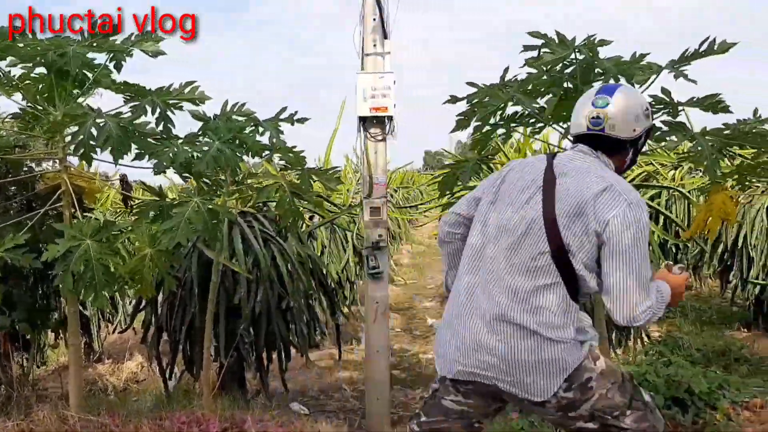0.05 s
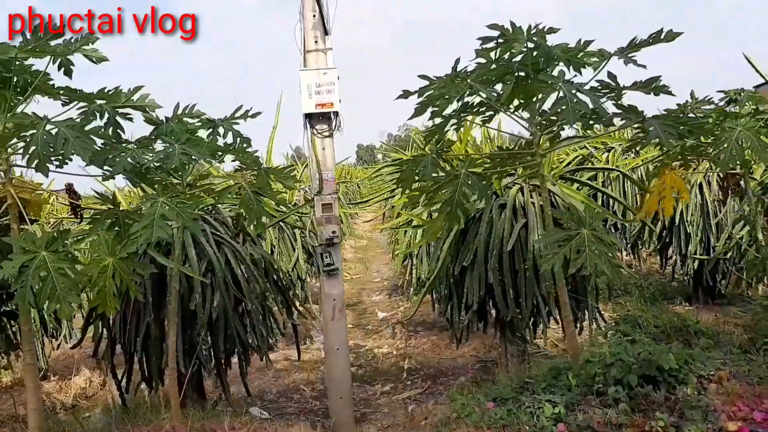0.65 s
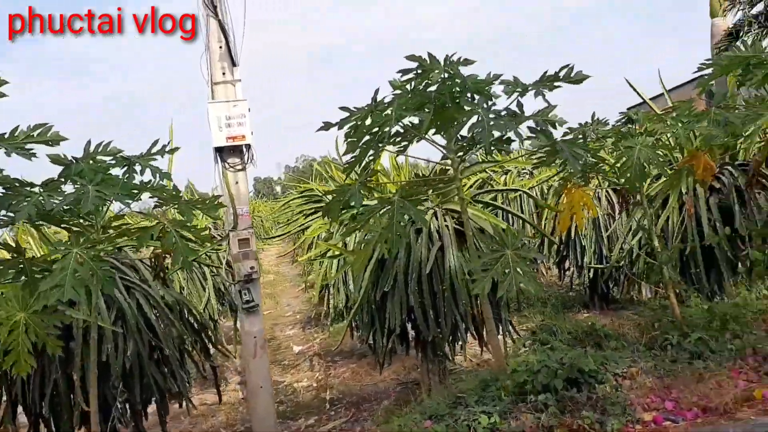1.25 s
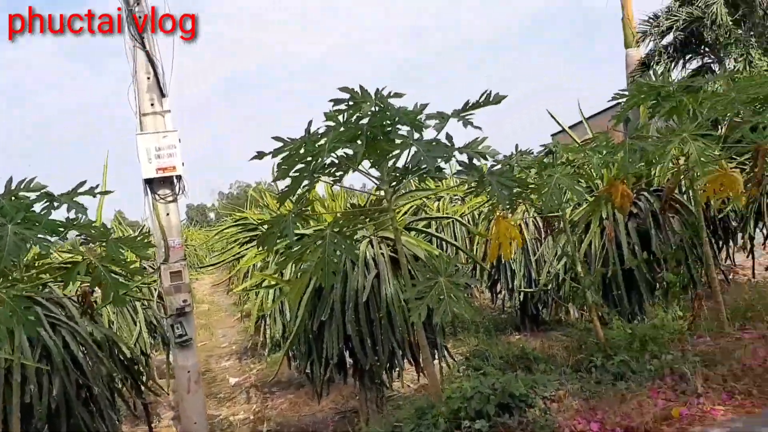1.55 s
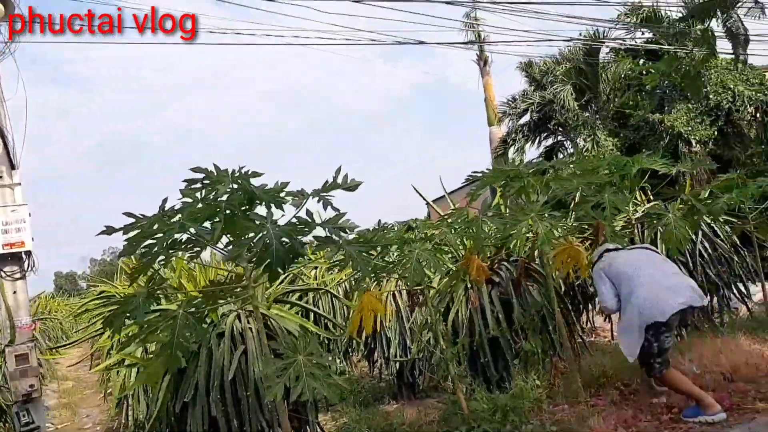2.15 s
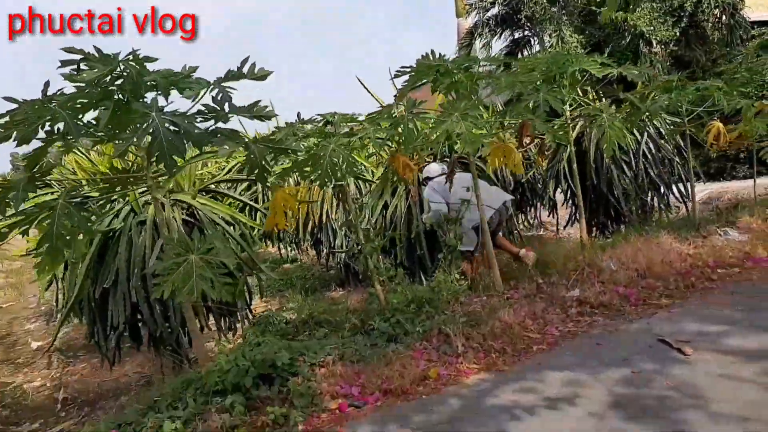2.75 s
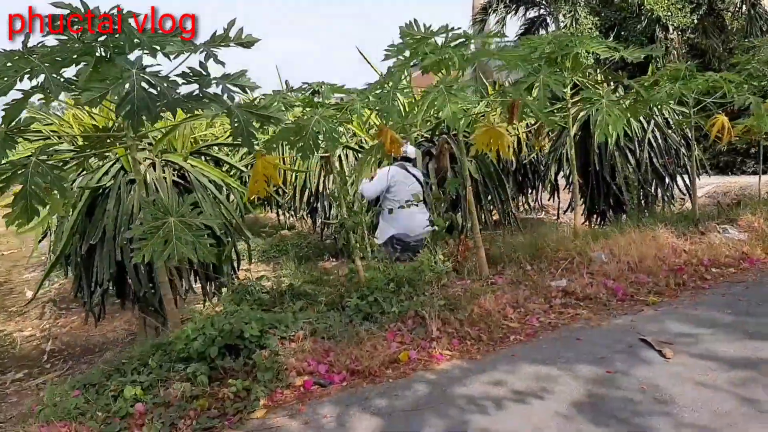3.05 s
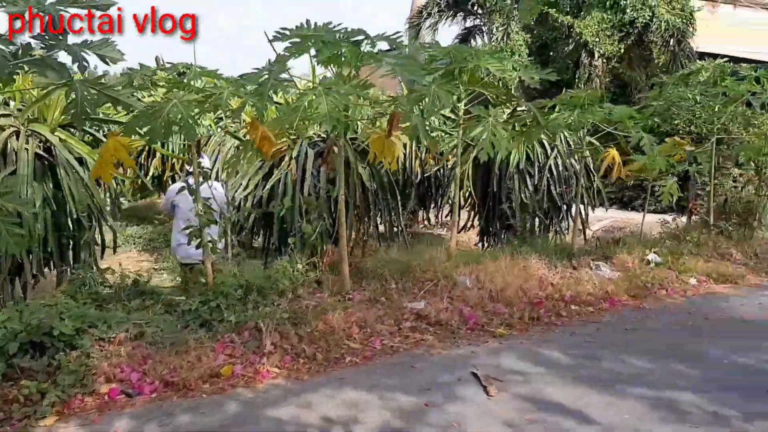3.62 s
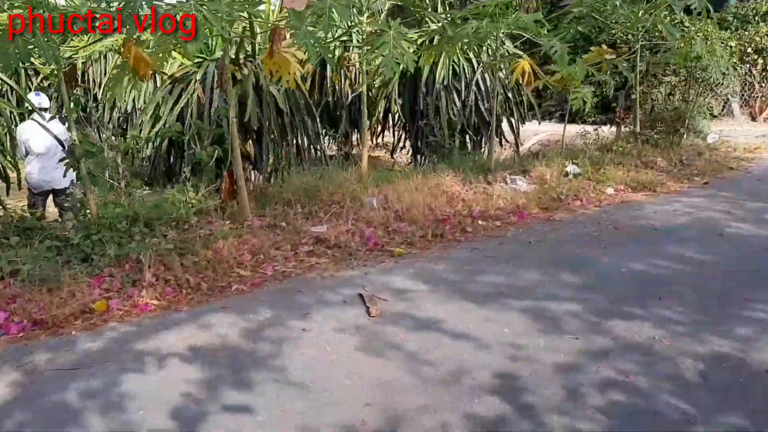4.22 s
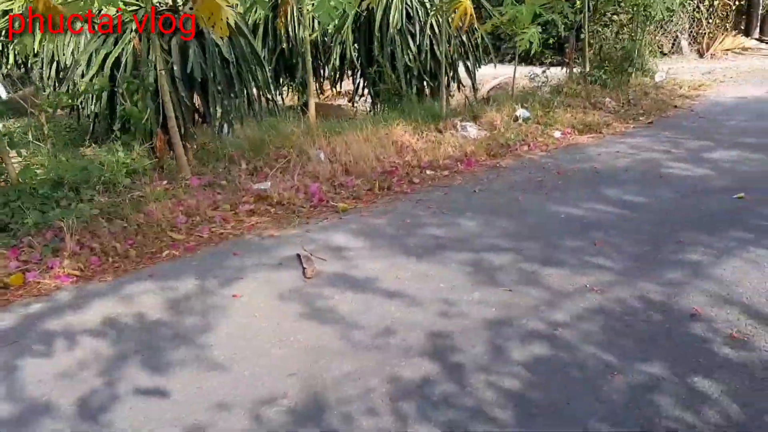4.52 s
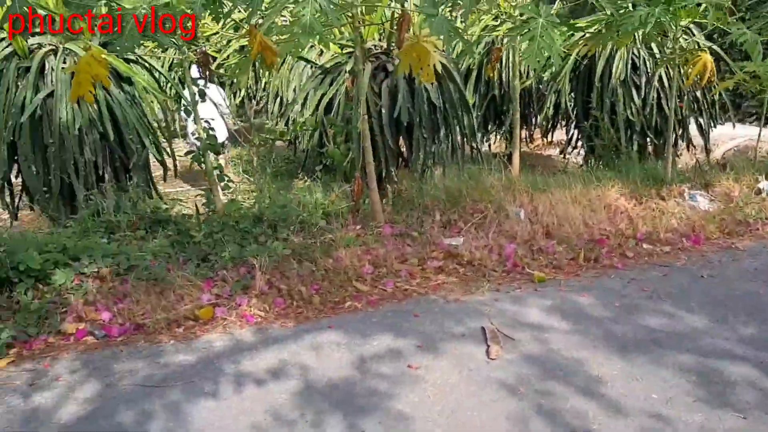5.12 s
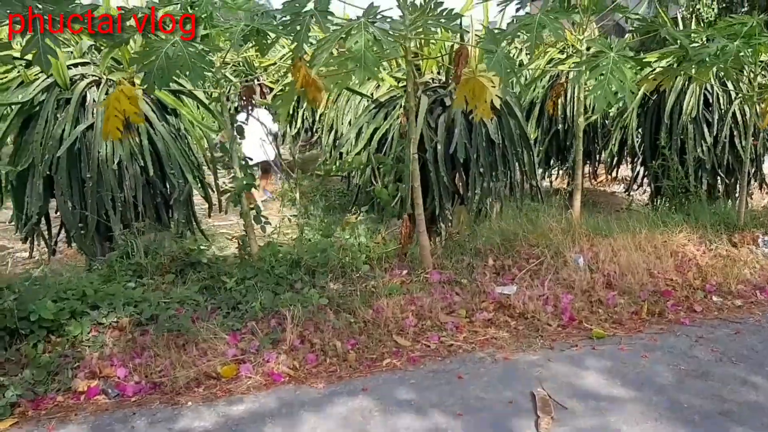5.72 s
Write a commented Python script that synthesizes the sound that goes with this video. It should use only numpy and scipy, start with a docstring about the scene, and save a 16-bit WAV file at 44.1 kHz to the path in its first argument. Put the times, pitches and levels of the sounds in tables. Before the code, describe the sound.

In a quiet orchard a bird repeats a short hooting call that rises, breaks upward and slides down. Someone walks through dry weeds, with swishing leaves, soft thuds and ticking twigs. Early on the bird pauses, a stick cracks sharply, and a soft throaty rattle follows before the hoots resume at an even pace. A light breeze rumbles on the microphone over a faint country hush.

```python
"""An orchard, where a bird repeats a hooting call that rises, breaks upward and slides down, with soft rattles
ringing its throat between calls. A short echo doubles the voice and foliage scatters it. Someone walks through
dry weeds: leaves swish, soles scuff and thud, twigs tick and one stick cracks sharply. A light breeze rumbles
at the microphone; behind it all lie a country hush, a faint squeak and the twitter of small birds."""
import sys
import numpy as np
from scipy import signal
from scipy.fft import rfft, irfft, next_fast_len
from scipy.io import wavfile
from scipy.ndimage import map_coordinates

SR = 44100
rng = np.random.default_rng(int(sys.argv[2]) if len(sys.argv) > 2 else 0)


def master_out(mix):
    """Clip the mix to full scale and print it as 16-bit PCM to the path in sys.argv[1]."""
    frames = np.transpose(np.atleast_2d(mix))
    ceiling = np.clip(frames, -1, 1)
    pcm = np.round(ceiling * 32767).astype(np.int16)
    wavfile.write(sys.argv[1], SR, pcm)


N = 263277
TIME = np.arange(N) / SR

# The bird's calls: (time [s], length [s], rise length [s], crest length [s], sag time [s],
# fall starts after [s], low voice [Hz], high voice [Hz], fall from [Hz], fall to [Hz],
# mid-rise level [dB], crest level [dB], slide level [dB], fall level [dB], overtones [dB],
# extra hoarseness [dB], rasp level [dB], crest attack [s], crest held [share]); levels are relative
CALLS = [(0.064, 0.2766, 0.0257, 0.197, 0.1323, 0.167, 802.4, 1126, 902.8, 830.5, -29.5, -27.5, -35, -37, -29, 1, -53.5, 0.0088, 0.31),
         (0.778, 0.246, 0.043, 0.161, 0.1092, 0.129, 800.5, 1117, 947.6, 796, -31.5, -34.5, -36.5, -35.5, -15.5, 6.5, -56.5, 0.0112, 0.226),
         (2.445, 0.385, 0.0503, 0.2366, 0.1064, 0.164, 883, 1175, 921, 871.8, -29, -22.5, -30.5, -39, -56.5, 6.5, -61, 0.0055, 0.487),
         (3.201, 0.346, 0.0384, 0.1997, 0.1024, 0.1704, 835.6, 1162, 921, 835.2, -33.5, -24, -37, -42, -40.5, 6, -51, 0.0055, 0.64),
         (3.9, 0.275, 0.0408, 0.184, 0.15, 0.1517, 843.9, 1156, 966.6, 814.5, -28, -27.5, -34.5, -29.5, -25, 7, -45, 0.014, 0.157),
         (4.534, .305, 0.0458, 0.191, 0.145, .15, 807, 1141, 935.6, 803.8, -30.5, -24, -29.5, -31, -25, 5.5, -48, 0.0146, 0.22),
         (5.193, 0.267, 0.046, 0.18, 0.1447, 0.2138, 793.5, 1144, 930.2, 743.2, -29, -31.5, -29, -30, -16.5, 5, -49, 0.023, 0.34),
         (5.931, .27, 0.0335, .17, .16, .15, 795, 1099, 940, 800, -22, -33, -30, -32, -27, -1.5, -51, 0.016, .3)]
# Tone colour of dry leaves: (frequency [Hz], relative level [dB])
LEAF_SPECTRUM = [(880, -9), (1500, -9), (2540, -9.5), (3650, -7.5), (4180, -7), (4610, -8.5), (6430, -11.5),
                 (9140, -21.5), (11700, -18.5), (15500, -27)]


def amp(db):
    """Decibels to gain."""
    return 10 ** (np.asarray(db) / 20)


def unit(x):
    """Scale to rms 1."""
    return x / np.sqrt(np.mean(x ** 2) + 1e-20)


def along(points, hz):
    """Read (frequency, value) points on a log frequency axis."""
    f, v = np.transpose(points)
    return np.interp(np.log(hz + 1), np.log(f + 1), v)


def curves(rows):
    """Automation: one value per sample for each column after the time."""
    times, *columns = np.transpose(rows)
    return [np.interp(TIME, times, column) for column in columns]


def wobble(rate, size=N):
    """A smooth random curve with rate knots a second."""
    knots = rng.standard_normal(int(size * rate / SR) + 4)
    return map_coordinates(knots, [np.arange(size) * rate / SR])


def swell(s, attack_s, hold_s, release_s):
    """An envelope that rises from time s and starts dying away at s + hold_s."""
    return np.clip((TIME - s) / attack_s, 0, 1) * np.exp(-np.maximum(TIME - s - hold_s, 0) / release_s)


def filtered(x, response):
    """Shape x with a complex frequency response."""
    n = x.shape[-1]
    m = next_fast_len(n + SR // 4)
    return irfft(rfft(x, m) * response(np.fft.rfftfreq(m, 1 / SR)), m)[..., :n]


def resonance(f, centre, width):
    """Response of one damped mode."""
    return 1j * f * width / (centre ** 2 - f ** 2 + 1j * f * width)


def noise_band(shape, hz, width):
    """Resonant noise of rms 1."""
    return unit(filtered(rng.standard_normal(shape), lambda f: resonance(f, hz, width) ** 2))


def rush(spectrum, correlation):
    """Coloured stereo noise of rms 1, partly shared by both sides."""
    mid, side = filtered(rng.standard_normal((2, N)), lambda f: amp(along(spectrum, f)))
    turn = np.arccos(correlation) / 2
    mid, side = np.cos(turn) * mid, np.sin(turn) * side
    return unit(np.array([mid + side, mid - side]))


def add(track, s, x):
    """Mix x into the track from time s."""
    part = track[..., max(round(s * SR), 0):][..., :x.shape[-1]]
    part += x[..., :part.shape[-1]]


def panned(db):
    """Stereo gains for a pan given as left minus right level."""
    return amp(np.array([np.atleast_1d(db), -np.atleast_1d(db)]) / 2)


def from_right(x):
    """Sound from the right bends round to the left microphone and reaches it later."""
    # Lag on the left: (frequency [Hz], phase [rad])
    left_lag = [(100, 0.34), (500, 0.9), (800, 2.374), (1200, 2.452), (2300, 5.803), (6000, 13.56),
                (16000, 34.7)]
    return filtered(x, lambda f: np.array([np.exp(-1j * along(left_lag, f)), np.ones(len(f))]))


def foliage(x):
    """Trunks and leaves scatter a short diffuse tail to each side."""
    # Decay of the tail: (frequency [Hz], t60 [s])
    decay_times = [(200, 0.358), (1100, 0.244), (3000, 0.144), (14000, 0.312)]
    hz, _, spectra = signal.stft(rng.standard_normal((2, SR // 3)), SR, nperseg=256)
    t = np.arange(spectra.shape[-1]) * 128 / SR
    decay = amp(-60 * t / along(decay_times, hz)[:, None])
    tail = signal.istft(spectra * decay, SR, nperseg=256)[1]
    return signal.fftconvolve(np.atleast_2d(x), tail / np.linalg.norm(tail[0]), axes=1)[:, :N]


def whistle(pitch, db, hoarse_db, overtone_db, edge_s=0.00487):
    """One bird note: a wavering, nearly pure tone with a hoarse fringe and overtones that bloom early."""
    n = len(pitch)
    t = np.arange(n) / SR
    waver = 1 + .005 * wobble(210.5, n) + .009 * wobble(44.37, n)
    phase = 2 * np.pi * np.cumsum(pitch * waver) / SR
    gate = np.sin(np.pi / 2 * np.clip(np.minimum(t, t[-1] - t) / edge_s, 0, 1)) ** 2
    level = amp(db + 1.5 * wobble(137.64, n))
    fringe = wobble(260.4, n) * np.sin(phase) + wobble(256.1, n) * np.cos(phase)
    bloom = np.exp(-((t / t[-1] - .3) / .32) ** 2) * amp(overtone_db + 3 * wobble(69.4, n))
    second = np.sin(2 * phase + .5 * wobble(227.7, n))
    third = amp(-7) * np.sin(3 * phase + wobble(261, n))
    return gate * level * (np.sin(phase) + bloom * (second + third) + amp(hoarse_db) * fringe)


def countryside():
    """A faint, nearly steady bed of distant air."""
    # Colour of the hush: (frequency [Hz], relative level [dB])
    hush_spectrum = [(59, -7.5), (100, 10), (146, 3), (228, -15), (287, 0), (519, 3.5), (727, 0), (825, -2),
                     (936, -6), (1060, 1.5), (1160, -17.5), (1660, -5.5), (3930, -10.5), (15500, -19)]
    return amp(-55.5 + 0.38 * wobble(2.12)) * rush(hush_spectrum, correlation=0.231)


def twitter(from_s=3.5, to_s=5, count=14, note_s=.05, hz=4202, spread=.07):
    """Small birds far off sing short random glides, heard only through the foliage."""
    out = np.zeros(N)
    for s in rng.uniform(from_s, to_s, count):
        start_hz, end_hz = hz * (1 + spread * rng.standard_normal(2))
        glide = np.linspace(start_hz, end_hz, int(note_s * SR))
        add(out, s, whistle(glide, db=-63.5, hoarse_db=-18, overtone_db=-80))
    return foliage(out)


def squeak(waver=.075, overtone_db=-10, scatter_db=-2):
    """A faint rough glide up and down, partly heard through the foliage."""
    # Contour of the squeak: (time [s], pitch [Hz], level [dB])
    contour = [(4.4, 1010, -53), (4.44, 1602, -43.5), (4.46, 2122, -48), (4.48, 1739, -55.5),
               (4.503, 1405, -39), (4.525, 1227, -51)]
    hz, db = curves(contour)
    gate = (TIME > contour[0][0]) & (TIME < contour[-1][0])
    phase = 2 * np.pi * np.cumsum(hz * (1 + waver * wobble(400))) / SR
    tone = gate * amp(db) * (np.sin(phase) + amp(overtone_db) * np.sin(2 * phase))
    return from_right(tone) + amp(scatter_db) * foliage(tone)


def breeze_and_footfalls(buffet_db=3):
    """Gusts at the microphone and dull steps both swell one low rumble."""
    # Strength of the breeze: (time [s], relative level [dB])
    gusts = [(0, -65.5), (.28, -53.5), (.5, -69), (.65, -54), (1.15, -59), (1.3, -54.5), (1.375, -62),
             (1.395, -45), (1.46, -44), (1.485, -50.5), (1.53, -45), (1.68, -58.5), (2.2, -64),
             (2.8, -60.5), (3.3, -54.5), (3.85, -61), (4.35, -55), (4.6, -53), (5.05, -61), (5.5, -56),
             (5.97, -55)]
    # Dull steps: (time [s], relative level [dB])
    footfalls = [(1.224, -60), (1.344, -47.5), (1.775, -56), (2.333, -52.5), (2.652, -51.5), (2.886, -61.5),
                 (3.1, -58.5), (4.369, -51.5), (4.815, -54.5), (5.47, -53.5), (5.906, -53)]
    # Colour of the rumble: (frequency [Hz], relative level [dB])
    rumble_spectrum = [(20, -67), (50, -9), (90, -2), (140, -2), (250, -7.5), (450, -13), (900, -66),
                       (2000, -41)]
    breeze = amp(curves(gusts)[0] + 1 + buffet_db * wobble(16))
    thuds = sum(amp(db + 6) * swell(s, attack_s=0.0083, hold_s=0.0271, release_s=0.0077)
                for s, db in footfalls)
    return np.hypot(breeze, thuds) * rush(rumble_spectrum, correlation=0.37) * panned(4.91)


def crunch(snaps_per_s=260, size_db=5):
    """Dry leaves give tiny snaps of very unequal size; rms 1."""
    sizes = amp(size_db * np.minimum(rng.standard_exponential((2, N)), 3))
    signs = rng.choice([-1, 1], (2, N))
    snaps = sizes * signs * (rng.random((2, N)) < snaps_per_s / SR)
    return unit(filtered(snaps, lambda f: amp(along(LEAF_SPECTRUM, f))))


def weeds():
    """Dry weeds stir all the time and flare into grainy swishes as legs brush through."""
    # Steady stir: (time [s], relative level [dB])
    stir = [(0, -63), (.3, -55.5), (.5, -60), (1.2, -59), (1.85, -61.5), (2.2, -59), (2.9, -54),
            (3.5, -53.5), (3.9, -55), (4.4, -55), (5.0, -58.5), (5.5, -56.5), (5.9, -53)]
    # Leg strokes: (time [s], length [s], relative level [dB], pan [dB])
    strokes = [(0.177, 0.0196, -50, 4), (0.596, 0.062, -53.5, 3), (0.855, 0.02, -54.5, -1.5),
               (1.919, 0.145, -56.5, -1.5), (2.393, 0.1083, -49.5, -0.5), (2.494, 0.0326, -48.5, 2),
               (2.52, 0.0294, -44, -1.5), (2.691, 0.05, -45, 0), (2.741, 0.0684, -42, -1.5),
               (2.822, 0.1096, -51, -0.5), (3.086, 0.014, -40.5, 3.5), (3.18, 0.029, -50, 0),
               (3.391, 0.0342, -45, 0), (3.562, 0.067, -59.5, -5), (4.434, 0.1, -60.5, -7),
               (4.818, 0.045, -48.5, -0.5), (5.268, 0.024, -53.5, -7), (5.695, 0.101, -51.5, 7.5),
               (5.886, 0.065, -50.5, 2.5)]
    grains = amp(1.8 * np.array([wobble(500), wobble(500)]) + 1.2 * wobble(45))
    leaves = unit(grains * rush(LEAF_SPECTRUM, correlation=0.087)) + crunch()
    swishes = sum(amp(db) * panned(pan_db) * swell(s, attack_s=0.0232, hold_s=length, release_s=0.01574)
                  for s, length, db, pan_db in strokes)
    return np.hypot(amp(curves(stir)[0]), swishes) * leaves * panned(0.068)


def scuffs():
    """Soles brush the ground: dull on packed earth, brighter on dry leaves."""
    # Sole brushes: (time [s], length [s], centre [Hz], relative level [dB])
    brushes = [(0.621, 0.0188, 590, -54), (0.866, 0.047, 7540, -73), (1.55, 0.01443, 550, -58.5),
               (1.992, 0.083, 2090, -73.5), (2.003, 0.0226, 870, -65.5), (2.649, 0.0141, 492, -63),
               (3.189, 0.0647, 1900, -63), (3.385, 0.0243, 2100, -62.5), (4.269, 0.02, 1134, -62),
               (4.314, 0.0601, 946, -62.5), (4.44, 0.0893, 2660, -70.5), (4.812, 0.0364, 2890, -59.5),
               (5.264, 0.068, 2770, -64.5)]
    out = np.zeros((2, N))
    for s, length, hz, db in brushes:
        envelope = np.hanning(int(length * SR))
        grit = noise_band((2, len(envelope)), hz, width=900 + 0.37 * hz)
        add(out, s, amp(db + 18.5) * envelope * grit)
    return out


def twigs(attack_s=0.001, t60=0.02297, scatter_db=-11):
    """Twigs break underfoot, each with its own blend of low knock, pitched snap and high fizz."""
    # Breaks, relative levels: (time [s], knock [dB], snap [dB], snap pitch [Hz], fizz [dB], pan [dB])
    breaks = [(0.196, -47.5, -39.5, 3440, -62, -4), (.251, -42.5, -44, 2100, -71.5, -3.5),
              (.279, -42.5, -48.5, 2000, -71.5, -5), (0.483, -69, -69.5, 7600, -57.5, -3),
              (0.587, -58.5, -47, 3220, -70, -5.5), (0.627, -40.5, -37.5, 1817, -68.5, 0),
              (0.629, -57, -39.5, 4140, -69.5, -10.5), (.961, -61.5, -52, 3120, -68, -7),
              (1.037, -43, -47.5, 2200, -66, -4), (1.208, -48, -48, 5530, -61, -2.5),
              (1.3699, -51.5, -43, 3440, -69, -7), (2.302, -59.5, -51.5, 4200, -62.5, -0.5),
              (2.703, -64, -37, 4500, -61, -2), (3.032, -50.5, -51, 2000, -68, -13.5),
              (3.098, -40.5, -38, 4350, -37, -9.5), (3.409, -62, -36.5, 4150, -50.5, -14.5),
              (3.7308, -43, -49, 2700, -61, -5), (4.841, -36, -32.5, 3080, -68, -7.5),
              (4.848, -37.5, -29.5, 2215, -71, -6.5), (5.834, -55.5, -42.5, 4640, -57, 3.5),
              (5.924, -50, -50.5, 4000, -64.5, 19)]
    out, t = np.zeros(N), np.arange(SR // 20) / SR
    envelope = (1 - np.exp(-t / attack_s)) * amp(-60 * t / t60)
    for s, knock_db, snap_db, snap_hz, fizz_db, _ in breaks:
        knock = amp(knock_db + 8) * noise_band(len(t), hz=1100, width=1200)
        snap = amp(snap_db + 5) * noise_band(len(t), hz=snap_hz, width=0.52 * snap_hz)
        fizz = amp(fizz_db + 5) * noise_band(len(t), hz=9700, width=46000)
        add(out, s, envelope * (knock + snap + fizz))
    pan_db = curves(breaks)[-1]
    return (from_right(out) + amp(scatter_db) * foliage(out)) * panned(pan_db)


def stick(gain_db=14, spread_db=-3, scatter_db=-8):
    """A dry stick splinters in quick bursts that ring its modes; each mode radiates its own way."""
    # The wood gives way in stages: (time [s], relative level [dB], t60 [s])
    stages = [(1.4785, -27.5, 0.0185), (1.4818, -35.5, 0.037), (1.487, -35, 0.154),
              (1.4964, -18.5, 0.00962)]
    # Modes of the stick: (frequency [Hz], width [Hz], gain [dB], pan [dB])
    modes = [(684, 223, -4.5, 1), (1763, 394, -4, -7), (2470, 480, -2.5, 0.5), (3230, 435, 5.5, -6.5),
             (4066, 448, 3, 3), (4336, 336, 5.5, -5), (5050, 540, 2, 0), (6410, 650, -8, 2),
             (7394, 760, -5.5, -1), (9450, 1240, -22, -1), (11350, 820, -19, -6), (12090, 700, -16, 7),
             (14330, 1450, -21.5, 4)]
    bursts, t = np.zeros((2, N)), np.arange(SR // 10) / SR
    for s, db, t60 in stages:
        splinters = unit(rng.standard_normal(len(t)) + amp(spread_db) * rng.standard_normal((2, len(t))))
        add(bursts, s, amp(db + gain_db - 60 * t / t60) * splinters)
    wood = filtered(bursts, lambda f: sum((-1) ** k * amp(db) * panned(pan_db) * resonance(f, hz, width)
                                          for k, (hz, width, db, pan_db) in enumerate(modes)))
    return wood + amp(scatter_db) * foliage(wood)


def rattles(ticks_per_s=110, width_hz=260):
    """Uneven ticks swell and fade as they ring the bird's throat, between calls and at their edges."""
    # Longer soft rattles: (time [s], length [s], resonance [Hz], level [dB])
    long_rattles = [(1.585, 0.22, 1188, -48), (1.63, 0.12, 1377, -57.5), (2.81, 0.13, 1071, -47)]
    rasps = []
    for s, length, *_, rasp_db, _, _ in CALLS:
        rasps.append((s - .025, 0.0337, 1306, rasp_db))  # hoarse onset
        rasps.append((s + length + 0.004166, 0.031, 1217, rasp_db))  # hoarse ending
    out = np.zeros(N)
    for s, length, hz, db in long_rattles + rasps:
        ticks = np.zeros(int(length * SR) + SR // 25)
        beats = np.arange(0, length, 1 / ticks_per_s)
        for start in beats + rng.uniform(0, 0.7703, len(beats)) / ticks_per_s:
            arch = .5 + np.sin(np.pi * min(start / length, 1))
            ticks[int(start * SR)] = amp(rng.normal(0, 0.67)) * arch
        ring = filtered(ticks, lambda f: resonance(f, hz, width_hz) ** 2)
        rms = np.sqrt(np.sum(ring ** 2) / (length * SR))
        add(out, s, amp(db) * ring / rms)
    return out


def pips(rise_s=0.00262):
    """The long rattle slows until it parts into single rings of the throat."""
    # Single pips: (time [s], pitch [Hz], relative level [dB])
    notes = [(1.793, 1375, -31), (1.863, 1383, -34.5), (1.907, 1357, -31.5), (1.942, 1452, -36.5),
             (2.046, 1119, -33.5), (2.083, 1134, -33), (2.12, 1183, -42)]
    out, t = np.zeros(N), np.arange(SR // 25) / SR
    envelope = t / rise_s * np.exp(1 - t / rise_s)
    for s, hz, db in notes:
        add(out, s, amp(db - 3) * envelope * np.sin(2 * np.pi * hz * t))
    return out


def hoots(rise_ratio=1.16, overlap_s=.008, scoop_s=0.0191, slide_at=0.725):
    """Each call rises in the low voice, breaks up to the high voice, sags and falls back to the low."""
    out = np.zeros(N)
    progress = lambda length: np.linspace(0, 1, int(length * SR))
    for (s, length, rise_s, crest_s, sag_s, fall_after_s, low_hz, high_hz, fall_hz, end_hz,
         rise_db, crest_db, slide_db, fall_db, overtone_db, rough_db, _, attack_s, hold) in CALLS:
        # The low voice climbs, swells and lingers past the break.
        u = progress(rise_s + overlap_s)
        pitch = low_hz * rise_ratio ** (u ** 2)
        db = rise_db + 16.5 * (.25 - (1 - u) ** 2)
        add(out, s, whistle(pitch, db, rough_db - 18, overtone_db - 7))
        # The high voice starts flat, settles, then sags along an S curve and roughens.
        u = progress(crest_s)
        t = u * crest_s
        scoop = 0.024 * np.exp(-t / scoop_s)
        sag = 0.165 * (1 - np.exp(-(t / sag_s) ** 2.74))
        db = np.interp(u, [hold, slide_at, 1], [crest_db, slide_db, slide_db - 6])
        hoarse_db = rough_db + np.interp(u, [0, 1], [-22, -15])
        crest = whistle(high_hz * (1 - scoop - sag), db, hoarse_db, overtone_db)
        add(out, s + rise_s - overlap_s / 2, np.minimum(t / attack_s, 1) * crest)
        # The low voice returns, hoarser still, and swells and fades as it falls.
        u = progress(length - fall_after_s)
        pitch = fall_hz * (end_hz / fall_hz) ** u
        db = fall_db + np.interp(u, [0, .5, 1], [-5, 0, -8])
        add(out, s + fall_after_s, whistle(pitch, db, rough_db - 12, overtone_db=-30))
    # A thin, level-pitched note swells into the third call.
    u = progress(0.14)
    db = -23.5 - 22 * (1 - u) ** 3
    add(out, 2.415, whistle(np.full(len(u), 1032), db, hoarse_db=-18, overtone_db=-30))
    return out


def bird(scatter_db=-10.5):
    """The voice arrives from the right, doubled by a short echo; farther plant rows answer faintly."""
    # Drift of the bird in the stereo image: (time [s], pan [dB], extra lag on the left [s])
    bearing = [(.2, -.5, -.00003), (.9, -1.6, -.00006), (2.52, -.7, .00009), (2.62, -.7, .00003),
               (3.4, -3.5, 0), (4.0, -3.8, 0), (4.7, -2.8, -.00004), (5.3, .9, -.00006)]
    echoes = [(.0348, .75), (.061, .12), (.094, .08)]  # (delay [s], gain [ratio])
    voice = amp(-1) * hoots() + rattles() + pips()
    doubled = filtered(voice, lambda f: 1 + sum(gain * np.exp(-2j * np.pi * f * delay)
                                                for delay, gain in echoes))
    pan_db, lag = curves(bearing)
    left, right = from_right(doubled)
    direct = np.array([np.interp(TIME - lag, TIME, left), right])
    return (direct + amp(scatter_db) * foliage(doubled)) * panned(pan_db)


def scene():
    """The hush of the countryside, the birds, the walker and the breeze."""
    return (countryside() + bird() + twitter() + squeak()
            + stick() + twigs() + scuffs() + weeds() + breeze_and_footfalls())


def record(dry):
    """A steep high cut takes off the very top of the treble."""
    top_hz = 15750
    return filtered(dry, lambda f: f < top_hz)


dry = scene()
out = record(dry)
master_out(out)
```